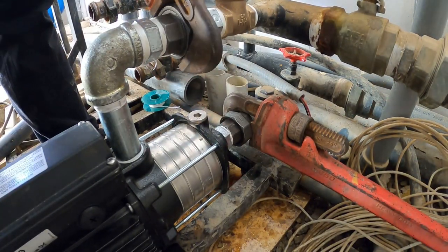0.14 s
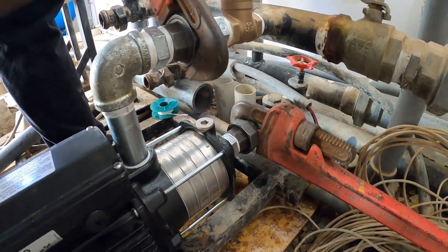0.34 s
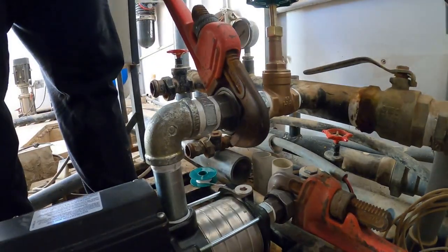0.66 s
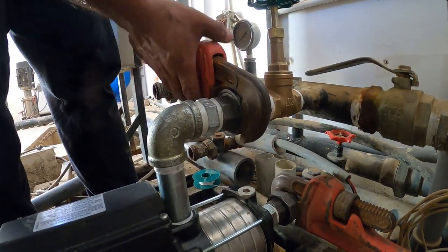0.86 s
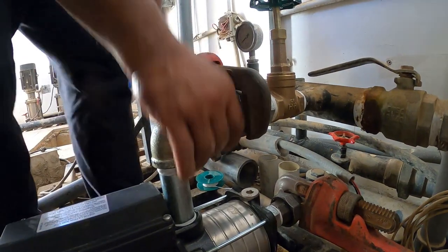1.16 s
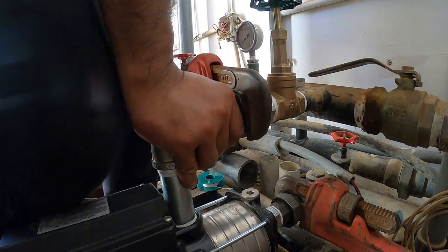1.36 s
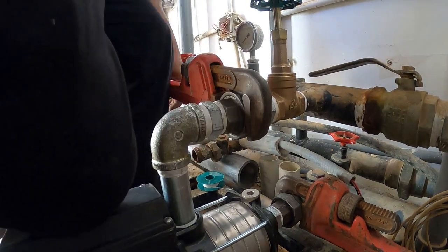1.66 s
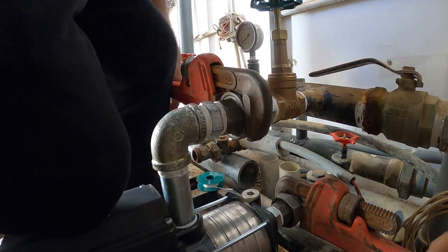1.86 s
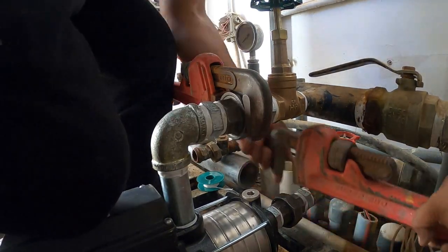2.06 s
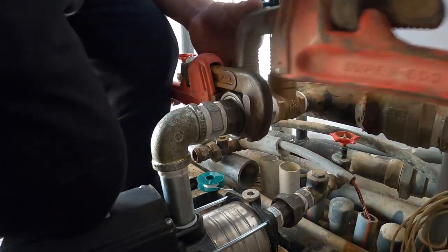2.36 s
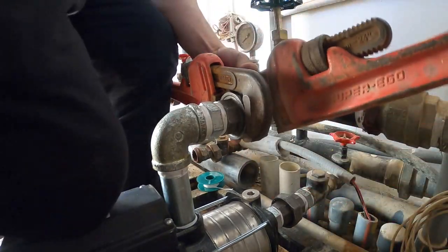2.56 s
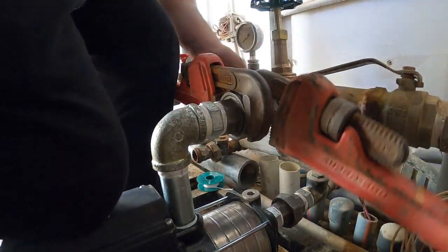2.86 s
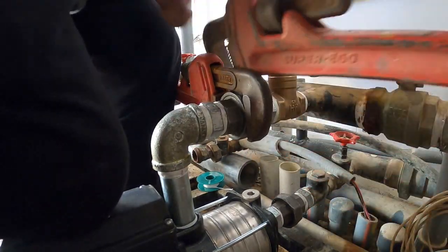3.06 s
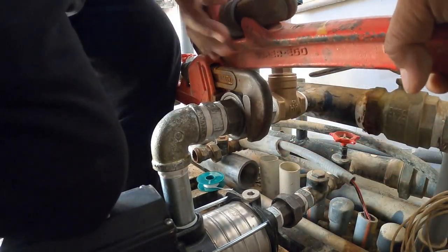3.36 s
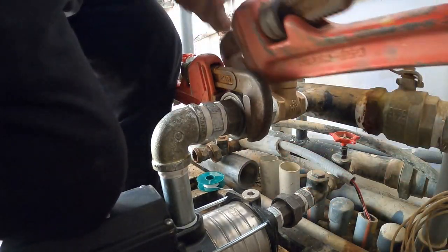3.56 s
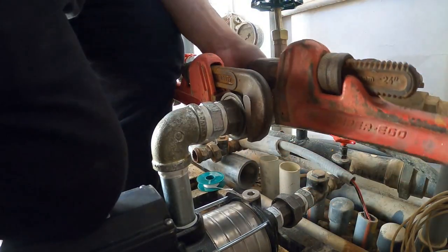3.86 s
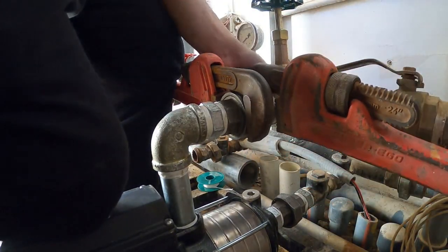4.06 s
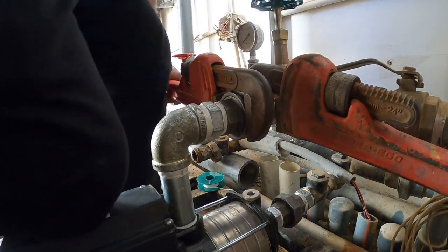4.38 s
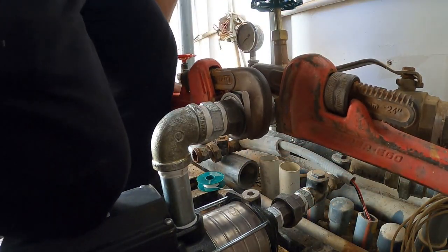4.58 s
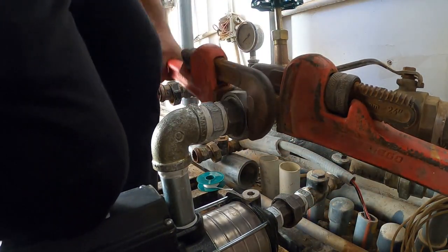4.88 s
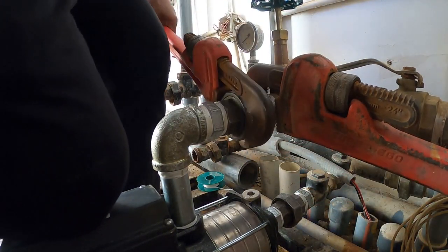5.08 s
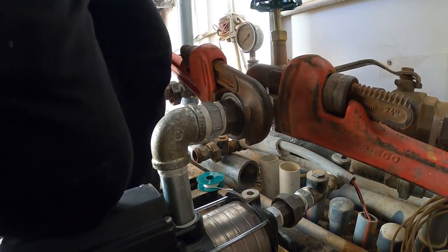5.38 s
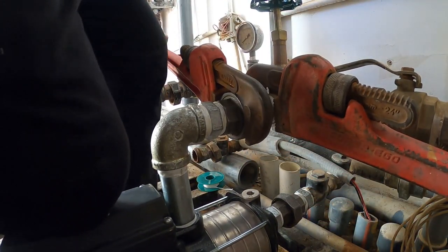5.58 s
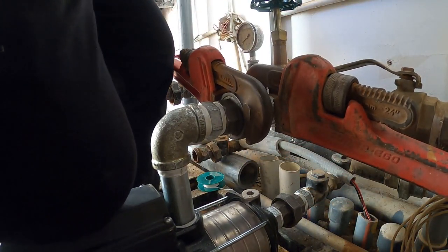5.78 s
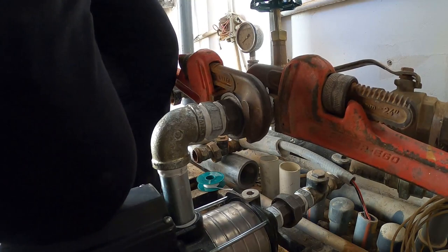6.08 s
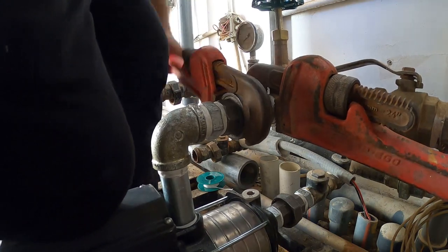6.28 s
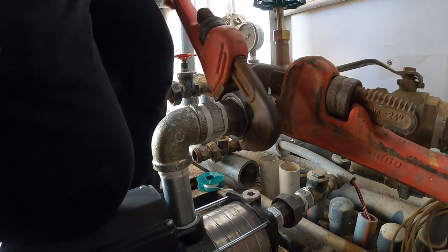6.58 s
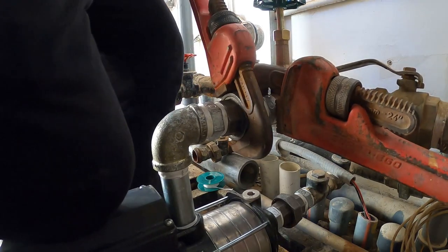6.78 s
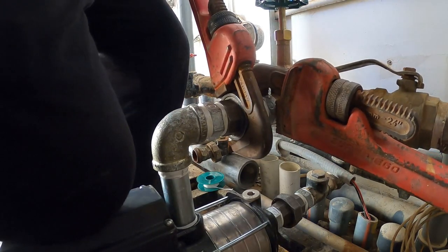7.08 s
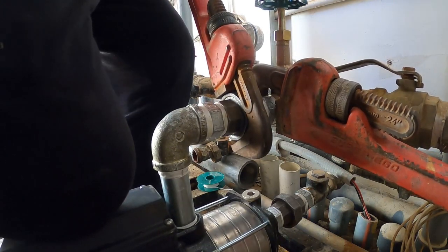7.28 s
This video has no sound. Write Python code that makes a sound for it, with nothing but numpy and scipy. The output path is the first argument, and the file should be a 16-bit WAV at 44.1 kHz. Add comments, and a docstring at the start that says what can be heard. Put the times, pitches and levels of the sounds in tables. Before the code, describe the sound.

Two heavy pipe wrenches knock and grind on a steel pipe joint, a loose jaw clinking rapidly, with brief squeaks over a low rumble.

```python
"""Pipe wrenches on a threaded joint

Two wrenches work on a steel joint above a pump, an arm's length from the microphone.
Biting jaws: gritty slip forces ring pipe modes. Loose hook jaw: blows ring wrench modes as it is carried and set.
Hand scrape, sleeves and rustle: dense random contacts, cloth-coloured. Squeaks: wavering sines.
Bumps: short low sines. Underneath: filtered-noise rumble and faint outdoor air."""
import sys
import numpy as np
from scipy import signal
from scipy.fft import rfft, irfft, next_fast_len
from scipy.io import wavfile
from scipy.ndimage import uniform_filter1d

SR = 44100
rng = np.random.default_rng(int(sys.argv[2]) if len(sys.argv) > 2 else 0)


def write(x):
    x = np.atleast_2d(x).T
    wavfile.write(sys.argv[1], SR, np.round(np.clip(x, -1, 1) * 32767).astype(np.int16))


N = 328102
T = np.arange(int(.3 * SR)) / SR  # time axis of one blow and of impulse responses [s]
LEAD_S = .05  # time before the main contact of a blow


def undb(db):
    """Decibels to gain."""
    return 10 ** (np.asarray(db) / 20)


def level(x, db):
    """Scale to unit rms, then apply a gain, fixed or varying in time."""
    return x * undb(db) / np.sqrt(np.mean(x ** 2))


def crest(x, db, span_s=0.0024):
    """Scale so that the loudest span has this rms level."""
    power = uniform_filter1d(x ** 2, max(int(span_s * SR), 1))
    return x * undb(db) / np.sqrt(power.max())


def band(x, lo_hz, hi_hz, order=3):
    """Causal Butterworth band-pass."""
    edges_hz = [lo_hz, min(hi_hz, SR / 2 - 1)]
    return signal.sosfilt(signal.butter(order, edges_hz, "band", fs=SR, output="sos"), x)


def colour(x, points):
    """Minimum-phase filter through (frequency [Hz], gain [dB]) points."""
    size = 2 * next_fast_len(len(x) // 2 + 1024)
    hz, db = np.transpose(points)
    grid_hz = np.arange(size // 2 + 1) * SR / size
    gain_db = np.interp(np.log(grid_hz + 1), np.log(hz), db)
    cepstrum = irfft(np.log(undb(gain_db)))
    # fold to the causal half
    cepstrum[1:size // 2] *= 2
    cepstrum[size // 2 + 1:] = 0
    response = np.exp(rfft(cepstrum))
    return irfft(rfft(x, size) * response)[:len(x)]


def fade(t60_s):
    """Exponential decay by 60 dB in t60_s."""
    return np.exp(-np.log(1000) * T / t60_s)


def walk(size, rate_hz):
    """Random wandering: normal knots at rate_hz joined by straight lines."""
    knots = rng.standard_normal(int(size * rate_hz / SR) + 2)
    return np.interp(np.arange(size) * rate_hz / SR, np.arange(len(knots)), knots)


def grit(size, rate_hz, spread_db):
    """Tiny contacts at random moments, a few much harder than the rest."""
    hardness = undb(spread_db * np.minimum(rng.exponential(size=size), 4))
    hits = rng.random(size) < rate_hz / SR
    return level(rng.standard_normal(size) * hardness * hits, 0)


def add(out, x, start_s):
    """Mix a sound in from a start time, cut at both ends of the scene."""
    i = int(start_s * SR)
    x, i = x[..., max(-i, 0):], max(i, 0)
    out[..., i:i + x.shape[-1]] += x[..., :max(N - i, 0)]


def ring(modes, detune, scatter_db):
    """Impulse response of steel: damped modes, weighted and detuned by the point of contact."""
    hz, db, t60_s = np.transpose(modes)[:, :, None]
    pitch, weight, phase = rng.standard_normal((3, len(modes), 1))
    waves = np.sin(2 * np.pi * (hz * (1 + detune * pitch) * T + phase))
    gains = undb(db + scatter_db * weight)
    return level(np.sum(gains * waves * fade(t60_s), axis=0), 0)


def contact(length_s, approach_db, approach_s, release_s, rate_hz, spread_db):
    """Force of a slip: contacts drag in, grind for length_s and let go."""
    t = T - LEAD_S
    approach = undb(approach_db) * np.exp(-abs(t) / approach_s)
    release = np.exp(-np.maximum(t - length_s, 0) / release_s)
    grip = np.where(t < 0, approach, release)
    return grip * grit(len(T), rate_hz, spread_db)


def weigh(x, bands, db, hardness_db):
    """Set each band of a blow from its strength and hardness."""
    return sum(crest(band(x, lo_hz, hi_hz), db + offset_db + slope * hardness_db)
               for lo_hz, hi_hz, offset_db, slope in bands)


def swell(length_s):
    """Time axis round zero and a Gaussian swell, at exp(-2) of its peak at +-length_s."""
    t = np.arange(-int(2 * length_s * SR), int(2 * length_s * SR)) / SR
    return t, np.exp(-2 * (t / length_s) ** 2)


PORT_LAG_S = .000033  # left port behind right
# relative spectrum of sound scattered by the pipes: (frequency [Hz], gain [dB])
PIPE_SCATTER = [(200, -13.5), (700, -3), (4000, 7.5), (12000, -2)]


def ports(x, scatter_db, t60_s):
    """Stereo: right port hears first; nearby pipes scatter differently to each port."""
    fractional_delay = np.sinc(np.arange(-8, 9) - PORT_LAG_S * SR) * np.hanning(17)
    late = np.convolve(x, fractional_delay, "same")
    sides = []
    for direct in (late, x):  # left, right
        near = colour(rng.standard_normal(len(T)) * fade(t60_s), PIPE_SCATTER)
        near = level(near, scatter_db) / np.sqrt(len(T))
        sides.append(direct + signal.fftconvolve(x, near)[:len(x)])
    return np.array(sides) / np.sqrt(1 + undb(scatter_db) ** 2)


def walls(x, db, t60_s):
    """Walls add a faint, dull tail of decaying noise."""
    tails = band(rng.standard_normal((2, len(T))), 120, 2100, order=1) * fade(t60_s)
    tails = level(tails, db) / np.sqrt(len(T))
    return x + signal.fftconvolve(x, tails, axes=1)[:, :N]


def pan(x, left_db):
    """Lean towards the left: left_db is the difference between channels."""
    return x * undb(np.array([[left_db], [-left_db]]) / 2)


RUMBLE_DB, AIR_DB = -30, -46.5
# rumble spectrum: (frequency [Hz], gain [dB])
RUMBLE_SPECTRUM = [(15, -22), (28, 8), (42, 3), (60, 8.5), (85, 2), (115, -7.5), (170, -10.5), (2000, -110)]
# outdoor air spectrum: (frequency [Hz], gain [dB])
AIR_SPECTRUM = [(60, -17.5), (150, -2), (300, -4.5), (600, -13), (1100, -19.5), (2500, -29), (6500, -65),
                (10000, -70.5), (15000, -95.5)]


def background():
    """Filtered noise: low rumble, nearly equal in both channels, and faint wandering outdoor air."""
    rumble = [level(colour(rng.standard_normal(N), RUMBLE_SPECTRUM), 0) for _ in range(2)]
    rumble[0] = rumble[0] / np.sqrt(uniform_filter1d(rumble[0] ** 2, int(.18 * SR)))  # even loudness
    air = [level(colour(rng.standard_normal(N), AIR_SPECTRUM), AIR_DB) for _ in range(2)]
    mid = rumble[0] * undb(RUMBLE_DB) + air[0] * undb(2.5 * walk(N, 9))
    side = rumble[1] * undb(RUMBLE_DB - 16) + air[1] * undb(-10)
    side = side + band(air[1], 1100, 15000, order=1) * undb(-1.5)  # wider treble
    return mid + side * np.array([[1], [-1]])


RUSTLE_DB = -60
# spectrum of cloth or skin friction: (frequency [Hz], gain [dB])
CLOTH_SPECTRUM = [(200, -21), (450, 13.5), (750, 5), (1200, 12), (2500, 6), (4200, -2), (6700, -6.5),
                  (9000, -21), (12000, -28.5), (15000, -39.5)]


def rustle():
    """Clothes never quite still: faint, fitful random contacts."""
    brushing = undb(9 * np.tanh(walk(N, 22)))
    sides = []
    for _ in range(2):
        fibres = colour(brushing * grit(N, 4200, 2.9), CLOTH_SPECTRUM)
        sides.append(band(fibres, 2500, 15000, order=1))
    return level(np.array(sides), RUSTLE_DB)


BITE, SNAP, SNAP_S = .22, .9, 0.0028  # first bite against the grinding; slips under SNAP_S mostly snap
# pipework resonances: (frequency [Hz], level [dB], t60 [s])
PIPE_RESONANCES = [(281.4, -13.5, 0.3), (417.6, -15, 0.092), (960, 4, 0.057), (1025, 4, 0.086),
                   (1130, -11.5, 0.033), (1494, 0, 0.037), (1835, -3, 0.072), (2676, 2.5, 0.012),
                   (3297, -8, 0.029)]
# dense, quickly damped part of a knock: (frequency [Hz], gain [dB])
KNOCK_BODY = [(80, 10.5), (200, -1), (450, -0.5), (740, -8), (1000, -1), (1400, -6), (3200, -12),
              (4600, -17.5), (7000, -29), (11000, -39), (15000, -61)]
# thud, clack, crunch: (from [Hz], to [Hz], level against strength [dB], hardness slope [dB/dB])
KNOCK_BALANCE = [(59.4, 540, 4.5, -0.45), (750, 3060, -2, 0.27), (3870, 20000, -20.5, 1.5)]


def knock(length_s, db, hardness_db, hollow_hz):
    """Teeth crush grit on the fitting; pipework answers with a thud and a short clack."""
    force = contact(length_s, approach_db=-7, approach_s=0.005 + 0.7 * length_s,
                    release_s=0.0012 + 0.38 * length_s, rate_hz=5000, spread_db=3.0)
    snap = BITE + SNAP * np.exp(-length_s / SNAP_S)
    force[int(LEAD_S * SR)] += snap * np.sqrt(np.sum(force ** 2))
    pipe_ring = ring(PIPE_RESONANCES, detune=0.015, scatter_db=1.5)
    hollow_ring = ring([(hollow_hz, 0, .045)], detune=0.044, scatter_db=0)
    pipe = signal.fftconvolve(force, pipe_ring)[:len(T)]
    hollow = signal.fftconvolve(force, hollow_ring)[:len(T)]
    x = level(colour(force, KNOCK_BODY), 0) + level(pipe, -8.5) + level(hollow, -13)
    return ports(weigh(x, KNOCK_BALANCE, db, hardness_db), scatter_db=-4.0, t60_s=0.019)


SETTLE_DB, SETTLE_DELAY_S, SETTLE_SLIP_S = -14.5, .02, 0.0037  # level against the bite; longest delay; slip
# jaws knocking and grinding: (time [s], slip length [s], strength [dB], hardness [dB])
JAW_BITES = [(0.099, 0.0063, -21, 1.5), (.172, 0.016, -23, -7), (.227, .022, -23.5, -4),
             (1.307, 0.002, -18, 8), (2.061, 0.012, -22, 1.5), (2.109, 0.023, -22, 2.5),
             (2.236, 0.0049, -22.5, 5.5), (2.338, 0.011, -26, -12.5), (2.539, 0.0038, -18.5, 2.5),
             (2.62, 0.041, -18.5, 6.5), (2.754, 0.0026, -28.5, 0.5), (2.862, 0.0016, -28, 15),
             (2.879, 0.01, -15.5, 5), (2.917, 0.0071, -21, 0.5), (2.943, .015, -28, 3.5),
             (3.028, 0.0055, -21, 3), (3.064, 0.011, -14.5, 1), (3.237, 0.012, -30, -20),
             (3.75, 0.018, -29, 0), (3.811, .018, -21, 5), (3.919, 0.002, -27.5, -2.5),
             (3.973, .004, -36.5, -6), (4.132, 0.022, -24, -3), (4.552, 0.0034, -34.5, 1),
             (4.761, 0.0016, -35.5, 0.5), (4.942, 0.036, -22, 2), (5.044, 0.018, -13, 3.5),
             (5.122, 0.0096, -23.5, 0.5), (5.611, 0.0033, -37, 4.5), (5.702, 0.0036, -33.5, -3.5),
             (6.313, 0.0014, -23, 6), (6.403, 0.0026, -29, -4), (6.427, 0.012, -21, 5.5),
             (6.462, 0.0076, -20, -0.5), (6.58, 0.0099, -18.5, -4), (6.7, .008, -19.5, -7),
             (6.747, 0.0055, -17.5, -4), (6.766, 0.0082, -16, 0.5), (6.794, .001, -37, 17.5),
             (7.284, 0.0067, -28.5, 5)]
# hollow resonance, shifting with the grip: (time [s], frequency [Hz])
HOLLOW_TUNING = [(.3, 430), (2.3, 179), (3.1, 365), (4.1, 290)]


def knocks():
    """Jaws bite and slip; the teeth catch lightly once more after each slip."""
    out = np.zeros((2, N))
    for time_s, length_s, db, hardness_db in JAW_BITES:
        hollow_hz = np.interp(time_s, *np.transpose(HOLLOW_TUNING))
        bite = knock(length_s, db, hardness_db, hollow_hz)
        add(out, bite, time_s - LEAD_S)
        settle = knock(SETTLE_SLIP_S, db + SETTLE_DB, hardness_db, hollow_hz)
        delay_s = SETTLE_DELAY_S * rng.uniform(.5, 1)
        add(out, settle, time_s + length_s + delay_s - LEAD_S)
    return out


AIRY_DB, AIRY_GROWTH = -25.5, 0.64  # highest fizz at 0 dB hiss; its growth [dB/dB]


def friction(rub_db, hiss_db, hiss_top_hz, patchy_db, spread_db):
    """Fibres or skin catch and release by the thousand, following rub and hiss levels."""
    size = len(rub_db)
    patches = undb(patchy_db * walk(size, 150))
    x = colour(patches * grit(size, 12000, spread_db), CLOTH_SPECTRUM)
    rub = level(band(x, 200, 3300), rub_db)
    hiss = level(band(x, hiss_top_hz / 2, hiss_top_hz), hiss_db)
    airy = level(band(x, 9600, 24000), AIRY_GROWTH * hiss_db + AIRY_DB)
    return ports(rub + hiss + airy, scatter_db=-1.0, t60_s=0.04)


# sleeves brushing past: (middle [s], length [s], rub level [dB], hiss against rub [dB])
SLEEVE_BRUSHES = [(0.203, .09, -51, 7), (0.505, 0.049, -44, 0.5), (.61, 0.069, -45, -1),
                  (0.748, 0.042, -45.5, -5), (0.822, 0.017, -55, 11), (1.63, 0.0066, -35, -10.5),
                  (1.714, .055, -43.5, -8), (1.861, 0.045, -31.5, -19.5), (1.992, 0.12, -32.5, -20),
                  (4.03, 0.018, -38.5, -3.5), (4.202, .027, -38.5, -9), (4.437, 0.089, -43, -12.5),
                  (5.475, 0.038, -50.5, -2), (5.952, 0.012, -51, -3), (7.317, .085, -37, -14)]


def sleeves():
    """Cloth brushes past: friction under Gaussian pressure swells."""
    out = np.zeros((2, N))
    for middle_s, length_s, db, hiss_db in SLEEVE_BRUSHES:
        t, pressure = swell(length_s)
        rub_db = db + 20 * np.log10(pressure)
        brush = friction(rub_db, rub_db + hiss_db, hiss_top_hz=8670, patchy_db=5.5, spread_db=3.5)
        add(out, brush, middle_s + t[0])
    return out


# hand along the wrench: (time [s], rasp level [dB], hiss level [dB])
HAND_PUSHES = [(1.23, -54, -47), (1.26, -21, -28.5), (1.296, -37, -46), (1.31, -23, -38), (1.318, -38, -47),
               (1.354, -36.5, -39), (1.39, -33, -22.5), (1.438, -36, -38), (1.512, -22.5, -25),
               (1.558, -25, -31), (1.6, -55, -60)]


def hand_scrape():
    """A hand slides along the wrench: friction in a few coarse pushes."""
    times_s, rasp_db, hiss_db = np.transpose(HAND_PUSHES)
    t = np.arange(times_s[0], times_s[-1], 1 / SR)
    rasp_db, hiss_db = np.interp(t, times_s, rasp_db), np.interp(t, times_s, hiss_db)
    out = np.zeros((2, N))
    add(out, friction(rasp_db, hiss_db, hiss_top_hz=6250, patchy_db=3.2, spread_db=3.0), t[0])
    return out


SQUEAK_S, SQUEAK_WAVER = .016, 0.0058  # swell length; waver as share of pitch
# steel sticking and slipping: (middle [s], frequency [Hz], level [dB])
STICK_SLIPS = [(1.322, 3810, -33), (1.72, 3230, -42), (4.872, 4520, -52), (4.952, 4180, -33),
               (4.982, 4230, -42), (6.434, 4750, -39), (7.247, 3550, -49.5)]


def squeaks():
    """Steel sticks and slips on steel: brief sines of wavering pitch."""
    out = np.zeros(N)
    t, pressure = swell(SQUEAK_S)
    for middle_s, hz, db in STICK_SLIPS:
        pitch_hz = hz * (1 + SQUEAK_WAVER * walk(len(t), 360))
        whistle = np.sin(2 * np.pi * np.cumsum(pitch_hz) / SR)
        add(out, crest(pressure * whistle, db), middle_s + t[0])
    return ports(out, scatter_db=-29, t60_s=0.065)


BUMP_S = 0.06  # swell length
# dull bumps and sways of the pipework: (middle [s], frequency [Hz], level [dB])
PIPE_SWAYS = [(1.922, 90.2, -19), (2.096, 110, -22), (4.155, 95, -26.5), (4.979, 97, -23),
              (5.198, 44.2, -18.5), (5.83, 146.4, -32.5), (6.478, 81.5, -20)]


def bumps():
    """Heavy pipework, leaned on, sways for a few cycles: low sines under a swell."""
    out = np.zeros(N)
    t, push = swell(BUMP_S)
    for middle_s, hz, db in PIPE_SWAYS:
        sway = np.sin(2 * np.pi * (hz * t + rng.random()))
        add(out, np.sqrt(2) * undb(db) * push * sway, middle_s + t[0])
    return out


# wrench resonances: (frequency [Hz], level [dB], t60 [s])
WRENCH_RESONANCES = [(943, -4.5, 0.086), (1488, -17.5, 0.12), (1897, 8.5, 0.084), (1750, -15, 0.21),
                     (2515, -21, 0.12), (2970, -4.5, 0.041), (3131, 7, 0.073), (3226, 6, 0.013),
                     (3480, -29, 0.062), (3880, -18, 0.037), (4236, -5, 0.057), (4574, -7, 0.03),
                     (4755, -9.5, 0.1), (5975, -11, 0.062), (6245, -19, 0.11), (6445, -17, .06),
                     (7680, -26.5, 0.064), (8450, -25, 0.07), (9780, -11, 0.046), (9500, -22, 0.067),
                     (12600, -26, 0.068), (14230, -26, 0.076)]
# dense, quickly damped part of a clink: (frequency [Hz], gain [dB])
CLASH_SPECTRUM = [(200, -5), (1000, 2.5), (1800, 10.5), (3500, 17), (4500, -2), (5400, -6), (6400, -17.5),
                  (7500, -10), (10000, -18), (10800, -38.5), (15000, -71)]
# hardness moves energy up: (from [Hz], to [Hz], level against strength [dB], hardness slope [dB/dB])
CLINK_BALANCE = [(1034, 2050, -2.5, -0.14), (2560, 3470, -0.5, 0.28), (3640, 8400, -9.5, 0.8253),
                 (9200, 13000, -30.5, 1.32)]


def clink(db, hardness_db):
    """One blow of the hook jaw rings the wrench modes over a short clash."""
    force = contact(0.0012, approach_db=-3.0, approach_s=0.0074, release_s=0.0053, rate_hz=4000, spread_db=5)
    force = force / np.sqrt(np.sum(force ** 2))
    force[int(LEAD_S * SR)] += .6  # main blow among the small ones
    steel = ring(WRENCH_RESONANCES, detune=0.0017, scatter_db=2.5)
    rings = signal.fftconvolve(force, steel)[:len(T)]
    x = level(rings, 0) + level(colour(force, CLASH_SPECTRUM), -14)
    return ports(weigh(x, CLINK_BALANCE, db, hardness_db), scatter_db=-6.5, t60_s=0.036)


CHATTER_DB, CHATTER_HARDNESS_DB, CHATTER_SPREAD_DB = -31, -6, 3  # spread is +- round both
# loose jaw hitting its frame: (time [s], strength [dB], hardness [dB])
JAW_BLOWS = [(2.034, -21, 0.5), (2.11, -16.5, -16), (2.141, -22.5, -1), (2.164, -15, -3), (2.227, -15, -3),
             (2.289, -24, -3.5), (2.336, -34.5, 25), (2.356, -13.5, -0.5), (2.459, -26.5, -12.5),
             (2.477, -29.5, -23.5), (2.55, -20, -13.5), (2.58, -16.5, -5.5), (2.614, -14.5, 5.5),
             (2.637, -16.5, 7), (3.062, -19.5, 11), (3.137, -20.5, -10), (3.169, -24.5, -2.5),
             (3.19, -16, -3.5), (3.207, -17, -12), (3.243, -21, -6), (3.291, -24.5, -20.5),
             (3.334, -17.5, 4), (3.356, -20, 8.5), (3.377, -16.5, -4.5), (3.44, -16.5, 6.5),
             (3.482, -25.5, 6), (3.528, -19.5, -6), (3.57, -22.5, 9.5), (3.607, -17, 8), (3.621, -18.5, 3),
             (3.64, -16.5, 3), (3.749, -18, -28.5), (3.825, -14, 0)]
# wrench in the air, jaw chattering: (from [s], to [s])
CARRY_SPANS = [(2.03, 2.68), (3.07, 3.76)]


def jaw_clinks():
    """Hook jaw hits its frame; seven light taps at random moments in each carry."""
    out = np.zeros((2, N))
    for time_s, db, hardness_db in JAW_BLOWS:
        add(out, clink(db, hardness_db), time_s - LEAD_S)
    for start_s, end_s in CARRY_SPANS:
        for when, force, edge in rng.uniform(size=(7, 3)):
            tap_db = CHATTER_DB + CHATTER_SPREAD_DB * (2 * force - 1)
            tap_hardness_db = CHATTER_HARDNESS_DB + CHATTER_SPREAD_DB * (2 * edge - 1)
            tap = clink(tap_db, tap_hardness_db)
            add(out, tap, start_s + when * (end_s - start_s) - LEAD_S)
    return out


JAW_SCRAPE_DB = -20  # gain against the rms of the clinks


def jaw_scrape(clinks):
    """Loose jaw slides in its frame: grit rings the wrench, harder the more it is shaken."""
    shaking = np.sqrt(abs(uniform_filter1d(clinks[1] ** 2, int(.09 * SR))))
    steel = ring(WRENCH_RESONANCES, detune=0, scatter_db=5.5)
    sides = []
    for _ in range(2):
        force = shaking * grit(N, 2500, 3.5)
        rings = signal.fftconvolve(force, steel)[:N]
        x = level(rings, 0) + level(colour(force, CLASH_SPECTRUM), 0.78)
        sides.append(band(x, 600, 6500))  # sliding is too soft to wake the highest modes
    return np.array(sides) * np.std(clinks) * undb(JAW_SCRAPE_DB)


def scene():
    """Ringing steel and handling noise close by, over the rumble."""
    clinks = jaw_clinks()
    steel = walls(clinks + jaw_scrape(clinks) + squeaks(), db=-38.5, t60_s=0.17)
    handling = walls(knocks() + hand_scrape() + sleeves() + rustle(), db=-18.0, t60_s=0.22)
    return pan(steel + handling, left_db=2.06) + pan(bumps() + background(), left_db=2.0)


TOP_HZ = 15200


def record(dry):
    """Soft saturation rounds the highest peaks; a steep low-pass cuts above TOP_HZ."""
    low_pass = signal.ellip(8, .2, 70, TOP_HZ, fs=SR, output="sos")
    return signal.sosfilt(low_pass, np.tanh(dry))


dry = scene()
out = record(dry)
write(out)
```